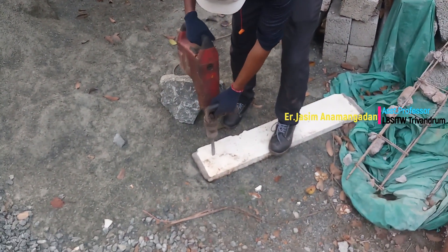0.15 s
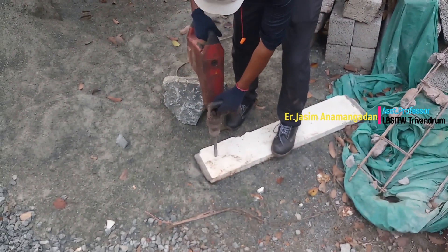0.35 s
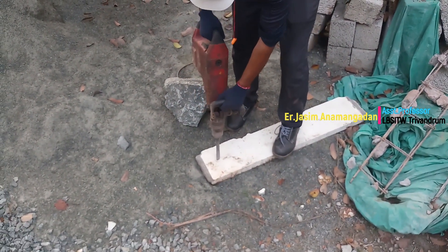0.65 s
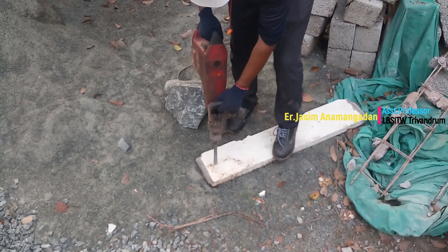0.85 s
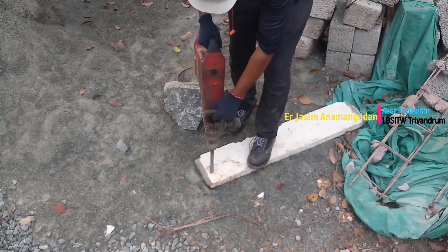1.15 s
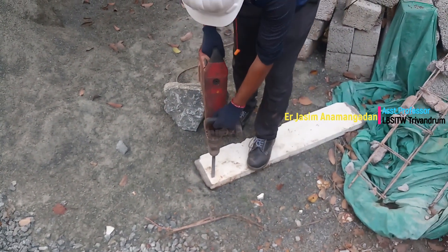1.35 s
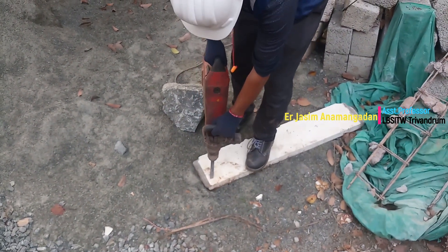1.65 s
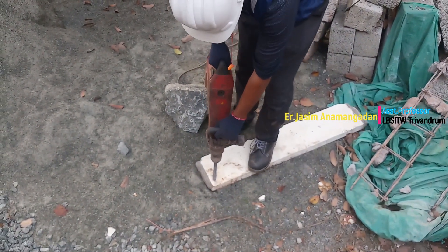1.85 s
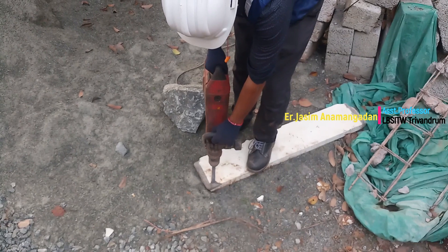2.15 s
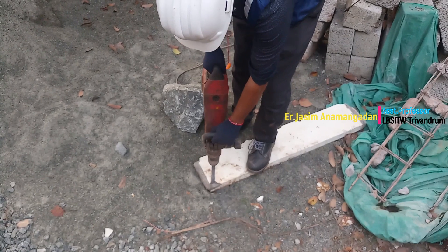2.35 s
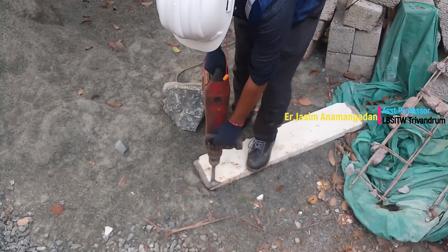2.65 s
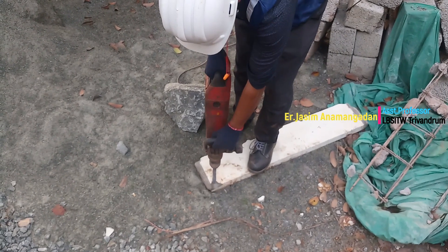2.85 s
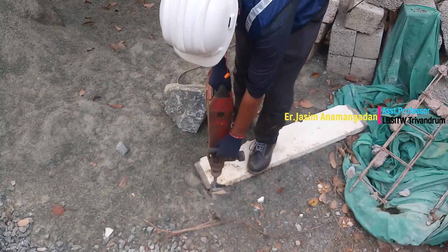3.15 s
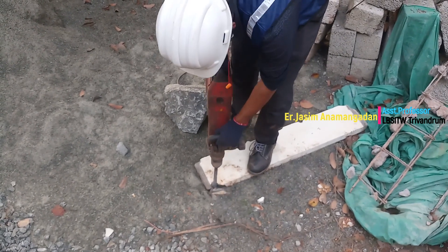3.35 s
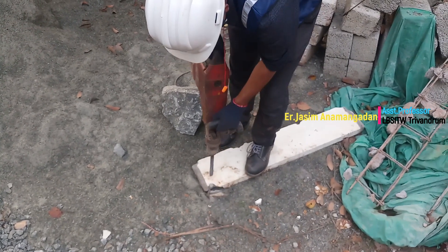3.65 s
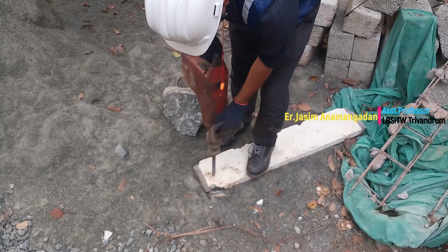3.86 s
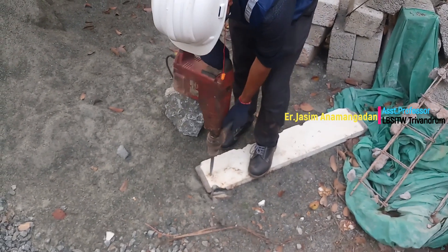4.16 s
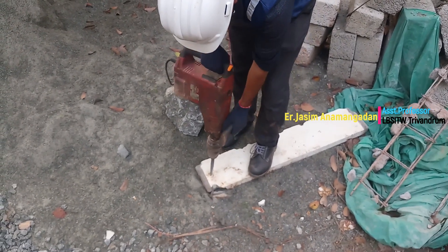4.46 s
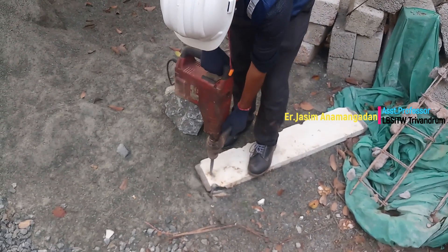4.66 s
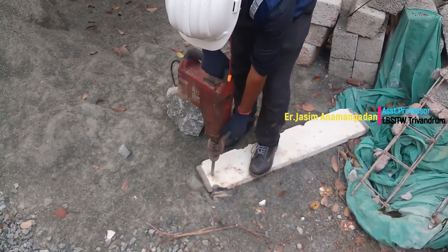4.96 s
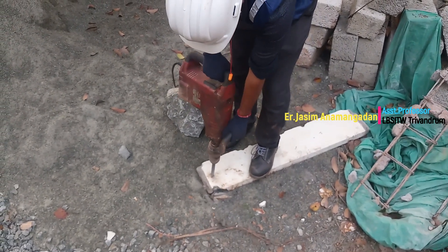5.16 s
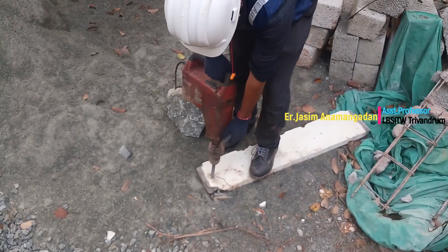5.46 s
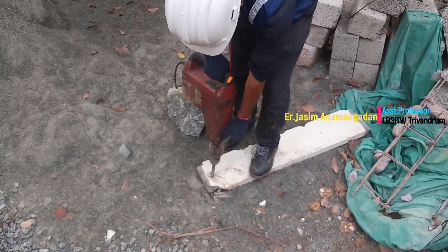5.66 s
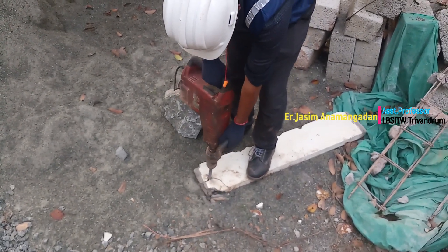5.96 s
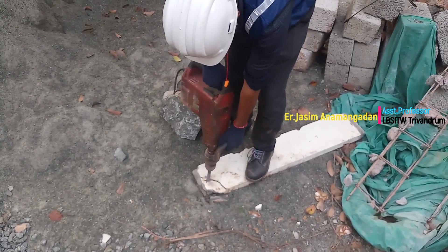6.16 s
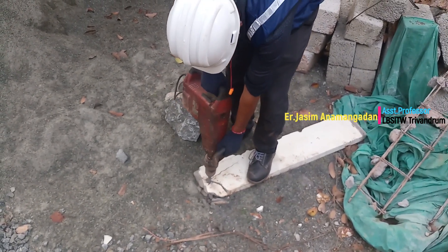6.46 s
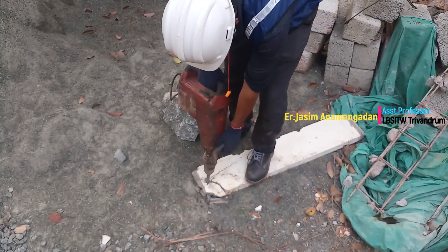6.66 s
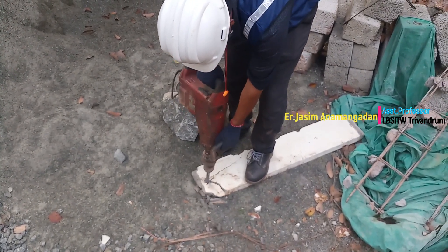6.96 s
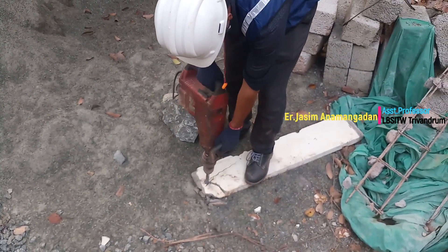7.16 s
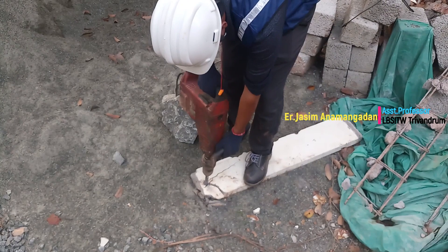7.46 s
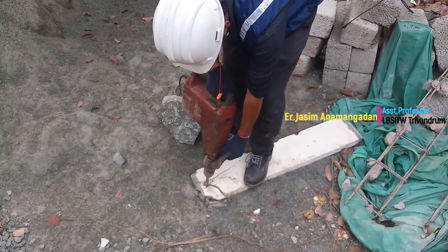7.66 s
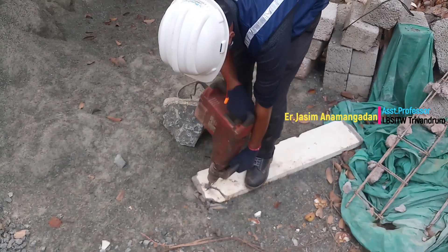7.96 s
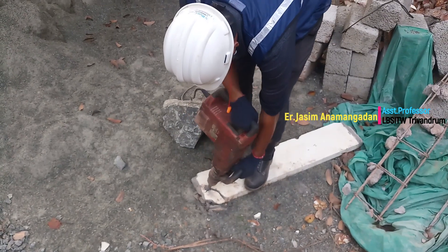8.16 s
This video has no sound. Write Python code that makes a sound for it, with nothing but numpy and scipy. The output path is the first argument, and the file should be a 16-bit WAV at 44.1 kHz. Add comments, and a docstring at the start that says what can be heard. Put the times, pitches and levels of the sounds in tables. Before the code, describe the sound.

Motor whirr and housing drone climb quickly, with striker clatter quickening to roughly thirty beats a second. Sharp gritty cracks, short slab knocks and low ground thuds come in brief spells, then in one sustained spell of about two seconds; afterwards only rattling, whirring and squealing steel continue. Heard in mono from a few metres away outdoors, with little reverberation.

```python
"""An electric demolition hammer chisels a concrete slab outdoors.
Its striker knocks twice for each turn of the crank: noise bursts coloured by the housing, with squeal and barrel ring.
While the bit is pressed home, each turn brings a blow: crack noise, slab and chisel resonances and a ground thud.
Fan and gears whirr as shaped noise; the motor spins up with a drone, a hum and a gear whine.
A dull echo of the cracks and the chisel ring comes back from a stack of blocks."""
import sys
import numpy as np
from scipy import signal
from scipy.fft import rfft, irfft, next_fast_len
from scipy.io import wavfile
from scipy.ndimage import uniform_filter1d, minimum_filter1d

SR = 44100
rng = np.random.default_rng(int(sys.argv[2]) if len(sys.argv) > 2 else 0)


def pcm_store(signal):
    """Save signal as 16-bit PCM."""
    levels = np.round(np.clip(np.atleast_2d(signal), -1, 1) * 32767)
    wavfile.write(sys.argv[1], SR, levels.astype(np.int16).T)


N = 366912
TIME = np.arange(N) / SR  # s

# Crank speed, sagging under load: start_s, speed_turns_per_s
CRANK_SPEED = [(0.0, 10.68), (0.479, 19.26), (1.074, 32.92), (1.455, 33.36), (2.041, 29.92), (2.576, 30.97),
               (2.947, 28.94), (3.451, 30.46), (4.3, 29.92), (4.86, 27.9), (5.341, 26.65), (5.87, 27.41),
               (6.582, 28.02), (6.642, 31.26), (7.141, 31.9), (8.32, 29.83)]
# How hard the machine rattles: start_s, level_db
RATTLE_LEVEL = [(0.0, -35), (0.21, -28.5), (0.42, -24), (1.02, -13), (1.71, -16), (1.94, -15.5),
                (2.32, -22.5), (2.62, -24), (2.85, -21), (3.26, -25), (4.12, -22.5), (4.61, -14.5),
                (6.4, -18.5), (6.67, -23), (7.58, -23), (7.83, -20), (8.13, -15.5), (8.32, -17)]
# Lateness of the forward knock under heavy load: start_s, lag_turns
FORWARD_LAG = [(4.85, 0.0088), (5.45, 0.06), (6.4, 0.068), (6.65, 0.018)]
# How the housing faces the listener: start_s, facing_0_to_1 (0 edge on, 1 broadside)
HOUSING_FACING = [(3.55, 0.1), (3.95, 0.99)]
# Housing resonances excited by the striker: pitch_hz, width_hz, edge_on_db, broadside_db
HOUSING_MODES = [(1585, 47, 12, 7), (2080, 210, -2, -34), (2670, 220, 13, 10.5), (2910, 190, -31, -2.5),
                 (3430, 154, 5, 4), (4920, 1100, 12, 7.5), (10300, 2900, 10, -36)]
# Steel sliding in the tool holder, against the knocks: start_s, pitch_hz, level_db
HOLDER_SQUEAL = [(1.0, 5160, -14), (4.45, 5200, -5.5), (4.8, 4970, -1), (5.35, 4880, -16), (5.6, 5710, 2),
                 (6.15, 6630, -2.5), (6.4, 5180, -3.5), (7.6, 5200, -8), (8.1, 5220, 0)]
# Spells with the bit pressed home, one blow a turn: start_s, end_s, crank_angle_turns,
# crack_db, slab_ring_db, ground_thud_db, chisel_ring_db
PRESSED_BOUTS = [(1.727, 2.045, 0.78, -15, -9.5, -35, -31.5), (2.16, 2.25, 0.82, -18.5, -9.5, -50, -42),
                 (2.716, 2.91, 0.76, -16, -8.5, -40, -36), (2.95, 3.019, 0.82, -11.5, -9, -50, -30),
                 (4.586, 4.716, 0.75, -16, -17, -38, -29), (4.774, 4.87, 0.73, -17, -13, -55, -26.5),
                 (4.895, 5.377, 0.75, -14, -9.5, -32, -32.5), (5.39, 6.577, 0.748, -14.5, -17, -49, -37.5)]
# Spread from blow to blow: crack_db, slab_ring_db, ground_thud_db, chisel_ring_db
BLOW_SPREAD = (1.5, 1.4, 1.0, 2.1)
# The concrete gives way and the slab drops on the soil: start_s, ground_thud_db
SLAB_BREAKS = [(1.843, -23), (2.038, -24), (2.207, -18), (2.241, -28), (2.795, -21), (2.829, -25),
               (2.86, -25), (2.895, -24), (4.706, -21.5), (4.848, -27), (5.25, -20), (5.288, -15),
               (5.989, -28)]
# Lone blows: the first as the bit settles in its holder, the rest as the bit skips: start_s, crack_db,
# slab_ring_db, ground_thud_db, chisel_ring_db
LONE_BLOWS = [(0.282, -20.5, -20.5, -47, -35), (1.71, -17.5, -15, -64, -37), (2.079, -22, -12.5, -54, -28.5),
              (2.133, -22, -11.5, -60, -48), (2.34, -27, -41, -70, -51), (2.936, -18.5, -18.5, -51, -46),
              (3.082, -32, -43, -70, -37), (3.194, -28, -43, -70, -60), (6.648, -26, -22, -68, -57)]
# Slab modes by bit position: pitch_hz, t60_s, corner_db, further_in_db, wedged_in_crack_db
SLAB_MODES = [(322, 0.039, -16, -10.5, -2.5), (473, 0.028, -14, -23, -4.5), (566, 0.04, -38, -21, 1.5),
              (918, 0.073, -14, -3.5, -10.5), (1123, 0.028, 6, -7.5, 1.5), (1235, 0.03, 1.5, -10, 5.5),
              (1416, 0.02, 5, -5, 3), (1527, 0.028, 3, 4, -4), (1775, 0.017, -1.5, 4, -2),
              (1875, 0.036, -6, 2, -39), (2240, 0.02, -21, -5, -3)]
# Where the bit stands: start_s, spot_0_to_2 (0 corner, 1 further in, 2 wedged)
BIT_SPOT = [(2.25, 0.38), (2.7, 0.21), (3.5, 0), (4.6, 1.64), (4.95, 1.09), (5.3, 1.37), (5.5, 2)]
# Chisel resonances: pitch_hz, width_hz, level_db
CHISEL_MODES = [(6820, 340, 5.5), (7600, 180, 1.5), (10220, 320, -12.5), (11730, 180, -6), (12130, 120, -3),
                (12800, 400, -7.5), (14800, 470, -6)]
# Relative noise spectrum of the striker's knocks: pitch_hz, level_db (per Hz)
KNOCK_SPECTRUM = [(200, -25), (300, 5), (520, -2), (720, -2.5), (1200, 4), (2700, 0.5), (4000, 1.5),
                  (5200, -1.5), (6500, 2.5), (7500, -2.5), (8500, -13.5), (9500, -31.5), (12500, -23.5),
                  (16000, -34)]
# Relative noise spectrum of crushing concrete: pitch_hz, level_db (per Hz)
CRACK_SPECTRUM = [(40, -32), (150, -11), (500, 2), (750, -6.5), (1500, 3), (2700, 2), (3300, -1.5),
                  (5000, 6), (6700, 5), (7700, 0.5), (8700, -15), (9550, -30), (10400, -15), (12200, -10.5),
                  (16000, -17.5)]
# Relative noise spectrum of fan and gears at full speed: pitch_hz, level_db (per Hz)
FAST_WHIRR_SPECTRUM = [(500, -49), (750, -5.5), (1000, -2.5), (1600, -0.5), (2080, -4), (2700, 2),
                       (3200, 0.5), (5200, 6), (6200, -0.5), (7500, -4), (8600, -14), (9500, -27.5),
                       (12500, -23), (16000, -22.5)]
# Relative noise spectrum of fan and gears when slow: pitch_hz, level_db (per Hz)
SLOW_WHIRR_SPECTRUM = [(200, -27), (420, -1), (540, -3), (720, -7), (1000, 3), (1400, 0), (2050, -7),
                       (2700, -3), (4100, -4), (6000, -16.5), (8000, -24.5), (9500, -43), (12000, -41),
                       (16000, -41)]
# Relative noise spectrum of the housing drone: pitch_hz, level_db (per Hz)
DRONE_SPECTRUM = [(30, -44), (100, -25), (170, -17.5), (215, -10), (255, -2.5), (340, -1), (470, 3.5),
                  (580, 1), (720, -11.5), (1100, -10), (3000, -65)]

MOTOR_RATIO = 60 / 7  # motor turns for one of the crank
SEATED_S = 1.7  # until then the bit hangs loose in its holder
# What a loose bit, then a pressed bit, adds to each level
LOOSE_WHIRR_DB, LOOSE_FORWARD_DB, LOOSE_RETURN_DB = 2.0, -9, 4
PRESSED_WHIRR_DB, PRESSED_FORWARD_DB, PRESSED_RETURN_DB = -1, 0, -4
# Below this speed in turns per s the knocks weaken
KNOCK_SPEED, KNOCK_DB_PER_SPEED = 25.5, 0.9
# Both ring less as the bit digs in
SLAB_DAMPING_DB_PER_S, CHISEL_DAMPING_DB_PER_S = 2.5, 0.5
BLOW_JITTER_S = 0.00015
BREAK_CRACK_DB = 5.5  # extra crack when the concrete gives way
CUTOFF_HZ = 15850


def striker(speed, turns, rattle_db, slam_angle=0.41, slam_db=6.5, clatter_db=-1.0):
    """The striker slams forward, clatters and returns; the housing's colour changes as it is turned."""
    force_db = rattle_db - KNOCK_DB_PER_SPEED * np.maximum(KNOCK_SPEED - speed, 0)
    forward_db = force_db + LOOSE_FORWARD_DB * loose() + PRESSED_FORWARD_DB * pressed()
    return_db = force_db + LOOSE_RETURN_DB * loose() + PRESSED_RETURN_DB * pressed()
    late_turns = turns - columns_at(FORWARD_LAG, TIME)[0]
    forward = knocks(late_turns, forward_db, angle=0.38, level_db=1.0,
                     scatter_s=0.0032, t60=0.021, uneven_db=2.0)
    back = knocks(turns, return_db, angle=0.836, level_db=-0.5,
                  scatter_s=0.0021, t60=0.017, uneven_db=3.5)
    knocking = np.hypot(forward, back)

    slam_s = np.interp(np.arange(int(turns[-1])) + slam_angle, late_turns, TIME)
    slams_db = np.interp(slam_s, TIME, forward_db) + slam_db
    modes = np.array(HOUSING_MODES)
    sides = []
    for level_column in (2, 3):  # edge on, then broadside
        colour = noise(KNOCK_SPECTRUM, modes[:, [0, 1, level_column]])
        slam = struck(slam_s, slams_db, colour, t60=0.027, rise=0.0015)
        sides.append(from_db(clatter_db) * knocking * colour + slam)
    edge, face = sides
    broadside = np.clip(columns_at(HOUSING_FACING, TIME)[0], 0, 1)
    housing = np.sqrt(1 - broadside) * edge + np.sqrt(broadside) * face
    squeal = knocking * rough_tone(*columns_at(HOLDER_SQUEAL, TIME), width_hz=520)
    return housing + squeal + broadside * barrel(knocking, speed, rattle_db)


def knocks(turns, strength_db, angle, level_db, scatter_s, t60, uneven_db, rise=0.0021, count=4):
    """Once a turn, at this crank angle, the striker clatters on its guide in a few quick contacts."""
    s = np.interp(np.arange(int(turns[-1])) + angle, turns, TIME)
    db = np.interp(s, TIME, strength_db) + level_db + rng.normal(0, 1.0, len(s))
    shape = (len(s), count)
    contacts_s = s[:, None] + scatter_s * (np.arange(count) + rng.random(shape)) / count
    contacts_db = db[:, None] + uneven_db * rng.standard_normal(shape)
    return bursts(contacts_s, contacts_db, t60, rise)


def barrel(knocking, speed, rattle_db, level_db=-2.0, hz=3570, at_speed=30, hz_per_speed=60,
           onset_db=-17.0, steepness=1.8, choke_speed=28.38, choke_db=7.0):
    """The barrel rings under hard rattle; load on the crank lowers its pitch and at last chokes it."""
    weak_db = steepness * np.minimum(rattle_db - onset_db, 0)
    choked_db = choke_db * np.maximum(choke_speed - speed, 0)
    pitch_hz = hz + hz_per_speed * (speed - at_speed)
    tone = rough_tone(pitch_hz, level_db + weak_db - choked_db, width_hz=200)
    return ringing_on(knocking, t60=0.007) * tone


def pressed():
    """1 while the bit is pressed home, 0 otherwise, with short ramps between."""
    inside = sum(1.0 * ((TIME > start) & (TIME < end)) for start, end, *_ in PRESSED_BOUTS)
    return uniform_filter1d(inside, size=1500)


def loose():
    """1 until the bit first seats in its holder, then 0, with a short ramp."""
    return uniform_filter1d(1.0 * (TIME < SEATED_S), size=4000)


def blow_list(turns):
    """The crank times one blow a turn in each bout; lone blows are added, in the columns of LONE_BLOWS."""
    rows = []
    for start, end, angle, crack_db, slab_db, thud_db, chisel_db in PRESSED_BOUTS:
        for s in np.interp(np.arange(int(turns[-1])) + angle, turns, TIME):
            if start < s < end:
                dug_s = s - start
                rows.append((s, crack_db, slab_db - SLAB_DAMPING_DB_PER_S * dug_s,
                             thud_db, chisel_db - CHISEL_DAMPING_DB_PER_S * dug_s))
    spread = [BLOW_JITTER_S, *BLOW_SPREAD]
    blows = np.array(rows) + rng.standard_normal((len(rows), 5)) * spread
    for s, thud_db in SLAB_BREAKS:
        nearest = np.argmin(np.abs(blows[:, 0] - s))
        blows[nearest, 1] += BREAK_CRACK_DB
        blows[nearest, 3] = thud_db
    return np.vstack([blows, LONE_BLOWS]).T


def crack(s, db, level_db=1.5, t60=0.056, snap_db=7.5, snap_t60=0.011, body_db=4.5):
    """Concrete crushes under the tip: a sharp snap, a spray of grit and a knock alike in every blow."""
    colour = noise(CRACK_SPECTRUM)
    grit = bursts(s, db + level_db, t60, rise=0.0014)
    snap = bursts(s, db + snap_db, snap_t60, rise=0.00051)
    knock = struck(s, db + body_db, colour, t60=0.032, rise=0.00039)
    return np.hypot(grit, snap) * colour + knock


def slab(s, ring_db, delay_s=0.000998, crumble=0.033, uneven_db=0.9):
    """Blows ring the slab; the spot under the bit weights the modes, crumbling roughens the push."""
    spot, out = columns_at(BIT_SPOT, s)[0], 0
    grit = crumble * rng.standard_normal(N)
    for k, (hz, t60, *by_spot) in enumerate(SLAB_MODES):
        mode_db = np.interp(spot, np.arange(len(by_spot)), by_spot)
        db = ring_db + mode_db + uneven_db * rng.standard_normal(len(s))
        force = clicks(s + delay_s, from_db(db)) + grit * bursts(s, db, t60=0.035, rise=0.0023)
        out = out + (-1) ** k * ring(force, hz, t60)  # neighbouring modes have opposite sign
    return out


def chisel(s, db, t60=0.15, uneven_db=4.0):
    """The steel bit rings on, differently after every blow, blurred by rattling in the holder."""
    out = 0
    for hz, width, mode_db in CHISEL_MODES:
        phase = 2 * np.pi * hz * TIME
        tone = rms_one(drift(width) * np.sin(phase) + drift(width) * np.cos(phase))
        blow_db = db + mode_db + uneven_db * rng.standard_normal(len(s))
        out = out + tone * bursts(s, blow_db, t60, rise=0.00074)
    return out


def thud(s, db, level_db=2.0, ground_hz=76, ground_t60=0.056,
         bounce_db=3.0, bounce_hz=165, bounce_t60=0.029):
    """The slab is driven against the soil and bounces back: two low modes of opposite sign."""
    push = clicks(s, from_db(db))
    ground = from_db(level_db) * ring(push, ground_hz, ground_t60)
    return ground - from_db(bounce_db) * ring(push, bounce_hz, bounce_t60)


def whirr(speed, turns, rattle_db, level_db=-3.5, slow_speed=17, full_speed=27,
          flutter_db=2.5, ripple=0.12):
    """Fan and gear noise brightens as the motor gathers speed and ripples with each motor turn."""
    fast = np.clip((speed - slow_speed) / (full_speed - slow_speed), 0, 1)
    air = np.sqrt(fast) * noise(FAST_WHIRR_SPECTRUM) + np.sqrt(1 - fast) * noise(SLOW_WHIRR_SPECTRUM)
    flutter = from_db(flutter_db * drift(600))
    grain = flutter * (1 + ripple * np.sin(2 * np.pi * MOTOR_RATIO * turns))
    bit_db = LOOSE_WHIRR_DB * loose() + PRESSED_WHIRR_DB * pressed()
    return from_db(rattle_db + level_db + bit_db) * grain * air


def motor(speed, turns, rattle_db, drone_db=-14.0, rest_db=-40, hum_db=-17.5, pressed_db=-3.0,
          hum_cut_hz=247, whine_db=-23, whine_hz=1310, whine_width_hz=70, teeth=57):
    """The housing drones, the rotor hums at its turning rate, the gear mesh sings through a resonance."""
    level = from_db(rattle_db + pressed_db * pressed())
    drone = np.maximum(level * from_db(drone_db), from_db(rest_db)) * noise(DRONE_SPECTRUM)
    # The hum fades when the motor is slow
    passed = 1 / np.sqrt(1 + (hum_cut_hz / (MOTOR_RATIO * speed)) ** 36)
    rotor = np.sin(2 * np.pi * MOTOR_RATIO * turns + 0.081 * drift(17))
    hum = from_db(hum_db + 2.4 * drift(7.1)) * passed * rotor
    resonance = 1 / (1 + ((teeth * speed - whine_hz) / whine_width_hz) ** 2)
    mesh = np.sin(2 * np.pi * teeth * turns + .85 * drift(140)) * resonance
    return drone + level * hum + from_db(whine_db) * mesh


def yard(x, echo_db=-15, wall_s=.0125, dull_hz=5000):
    """One dull echo returns from a stack of blocks."""
    late = np.interp(TIME - wall_s, TIME, x, left=0)
    return x + from_db(echo_db) * signal.sosfilt(signal.butter(1, dull_hz, fs=SR, output="sos"), late)


def from_db(db):
    """Decibels to gain."""
    return 10 ** (np.asarray(db) / 20)


def rms_one(x):
    """Scale to unit rms."""
    return x / np.sqrt(np.mean(x ** 2) + 1e-20)


def columns_at(rows, s):
    """The columns of a curve at the times s."""
    knots, *columns = np.transpose(rows)
    return [np.interp(s, knots, c) for c in columns]


def noise(spectrum, resonances=()):
    """Unit-rms noise with a broad spectrum and resonances (pitch_hz, width_hz, peak_db) on top."""
    size = next_fast_len(N)
    hz = np.arange(size // 2 + 1) * SR / size + 1e-3
    knots, levels = np.transpose(spectrum)
    db = np.interp(np.log(hz), np.log(knots), levels)
    for centre, width, peak in resonances:
        db = db + peak / (1 + (2 * (hz - centre) / width) ** 2)
    return rms_one(irfft(rfft(rng.standard_normal(size)) * from_db(db), size)[:N])


def drift(rate):
    """Random wander: straight lines between normal draws of spread 1, rate draws per second."""
    return np.interp(TIME * rate, np.arange(N), rng.standard_normal(N))


def clicks(s, heights):
    """Single-sample impulses at the times s."""
    places = np.clip(np.round(s * SR), 0, N).astype(int).ravel()
    return np.bincount(places, np.ravel(heights), N + 1)[:N] + 1e-18


def bursts(s, db, t60, rise):
    """Envelope of overlapping contacts whose energies swell quickly and die away."""
    fall, swell = from_db(-120 / (t60 * SR)), np.exp(-1 / (rise * SR))
    energy = signal.lfilter([1], [1, -fall], clicks(s, from_db(db) ** 2))
    return np.sqrt(signal.lfilter([1 - swell], [1, -swell], energy))


def ring(force, hz, t60):
    """A unit click sets a decaying sine of starting height 1 ringing."""
    r, w = from_db(-60 / (t60 * SR)), 2 * np.pi * hz / SR
    return signal.lfilter([0, np.sin(w)], [1, -2 * r * np.cos(w), r * r], force)


def struck(s, db, colour, t60, rise):
    """A body with many close modes answers every hit with the same dying burst of this colour."""
    t = TIME[TIME < .1]
    response = colour[:len(t)] * from_db(-60 * t / t60) * (1 - np.exp(-t / rise))
    return signal.fftconvolve(clicks(s, from_db(db)), response)[:N]


def rough_tone(hz, db, width_hz):
    """A rattled resonance of moving pitch and level, its pitch jittering at random."""
    phase = 2 * np.pi * np.cumsum(hz + width_hz / 2 * drift(width_hz)) / SR
    return from_db(db) * np.sqrt(2) * np.sin(phase)


def ringing_on(envelope, t60):
    """A resonator stores the energy of each knock and gives it back slowly."""
    keep = from_db(-120 / (t60 * SR))
    return np.sqrt(signal.lfilter([1 - keep], [1, -keep], envelope ** 2))


def small_source(x, cut_hz):
    """A small body radiates little bass."""
    return signal.sosfilt(signal.butter(2, cut_hz, "high", fs=SR, output="sos"), x)


def scene():
    """The crank speed times the striker and the pressed blows; lone blows sound on top."""
    speed, rattle_db = columns_at(CRANK_SPEED, TIME)[0], columns_at(RATTLE_LEVEL, TIME)[0]
    turns = np.cumsum(speed) / SR
    rattling = striker(speed, turns, rattle_db) + whirr(speed, turns, rattle_db)
    machine = small_source(rattling, cut_hz=255) + motor(speed, turns, rattle_db)
    s, crack_db, slab_db, thud_db, chisel_db = blow_list(turns)
    echoed = yard(crack(s, crack_db) + chisel(s, chisel_db))
    blows = small_source(slab(s, slab_db) + echoed, cut_hz=93) + thud(s, thud_db)
    return (machine + blows)[None]


def record(dry):
    """A fast limiter holds the peaks to a ceiling, then a steep low-pass cuts the top."""
    ceiling = .95
    allowed = ceiling / np.maximum(np.abs(dry), ceiling)
    gain = uniform_filter1d(minimum_filter1d(allowed, size=89), size=89)  # about 2 ms
    low_pass = signal.ellip(12, .1, 70, CUTOFF_HZ, fs=SR, output="sos")
    return signal.sosfilt(low_pass, dry * gain)


dry = scene()
out = record(dry)
pcm_store(out)
```